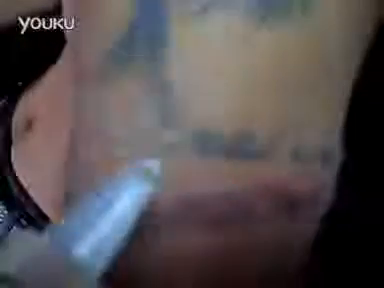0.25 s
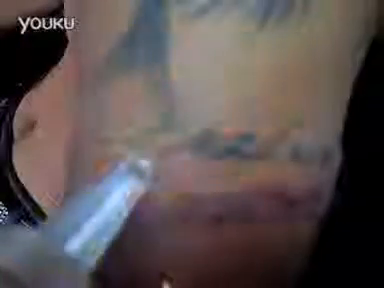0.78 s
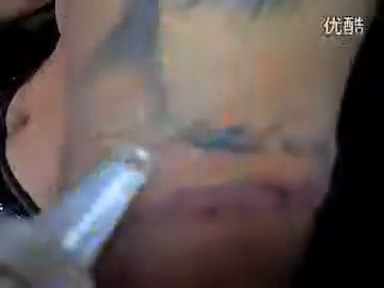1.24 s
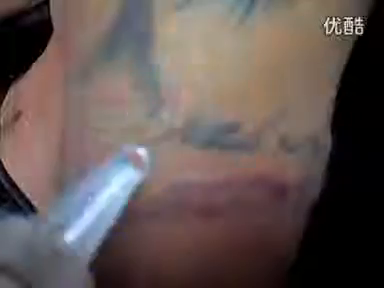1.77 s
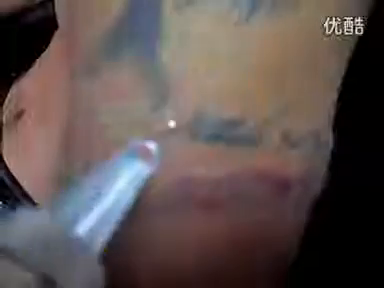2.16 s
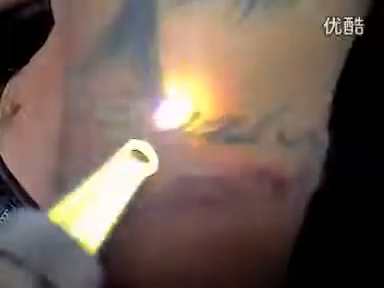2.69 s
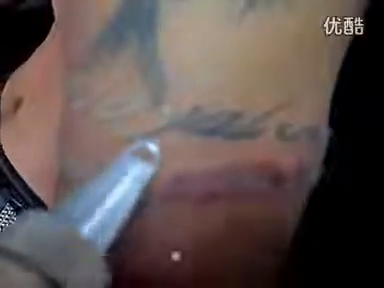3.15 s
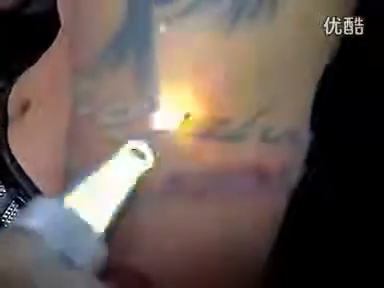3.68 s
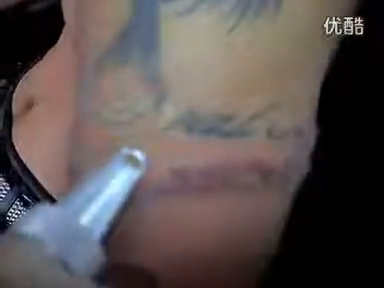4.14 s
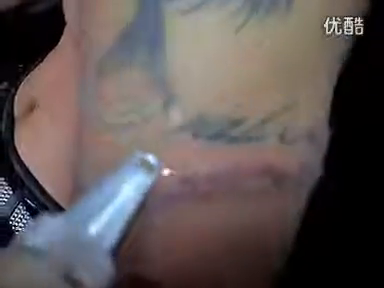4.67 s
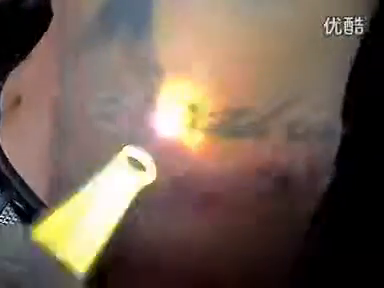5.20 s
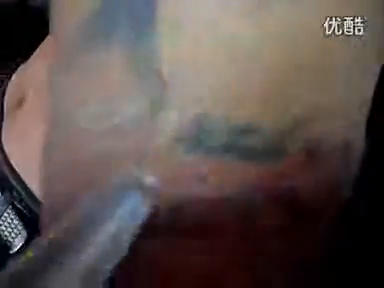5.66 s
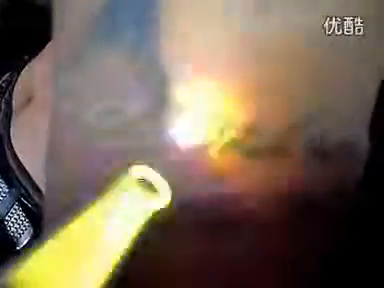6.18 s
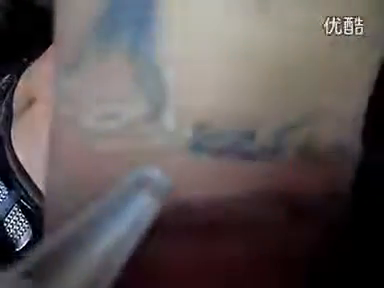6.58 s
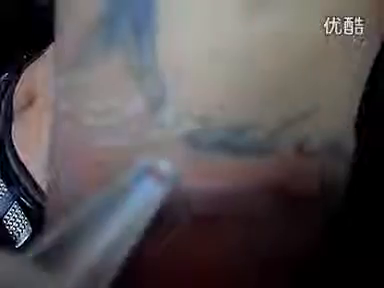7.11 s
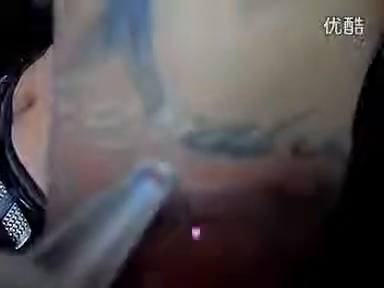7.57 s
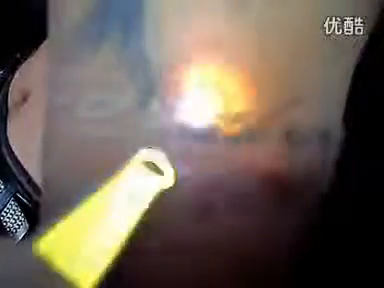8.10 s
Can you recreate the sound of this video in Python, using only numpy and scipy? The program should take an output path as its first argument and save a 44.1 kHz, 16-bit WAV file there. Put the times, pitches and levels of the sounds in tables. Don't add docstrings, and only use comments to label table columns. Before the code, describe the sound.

After just under a second of silence, sound cuts in abruptly: a handheld skin laser snapping very close to a small, overloaded microphone, six even cracks a second. Each is dry, bright and slightly metallic, with quick wall echoes and a short diffuse tail. Beneath run a low electrical hum, soft fan rush and faint rumble. Later shots include a few harder, thumpier ones.

```python
import sys
import numpy as np
from scipy import signal
from scipy.fft import rfft, irfft, next_fast_len
from scipy.io import wavfile
from scipy.ndimage import map_coordinates

SR = 44100
rng = np.random.default_rng(int(sys.argv[2]) if len(sys.argv) > 2 else 0)


def elevation(decibels):
    levels = np.asarray(decibels, float)
    return 10 ** (levels / 20)


def file_out(sig):
    cols = np.atleast_2d(sig).T
    lim = np.clip(cols, -1, 1)
    pcm = np.round(lim * 32767).astype(np.int16)
    wavfile.write(sys.argv[1], SR, pcm)


N = 367353

# time in seconds, level in dB.
HUM = [
    (0.82, -39),
    (0.99, -39),
    (2.26, -40.5),
    (2.6, -38.5),
    (5.67, -36),
    (5.99, -37.5),
    (6.3, -36.5),
    (7.58, -37),
    (8.33, -38),
]
# time in seconds, level in dB.
SHAFT = [(0.82, -40), (0.86, -45), (2.37, -37.5), (2.41, -51), (3.33, -45), (3.41, -64), (3.5, -35.5),
         (5.36, -37.5), (5.42, -39), (6.36, -30.5), (6.93, -32), (7.05, -51), (7.24, -37), (8.33, -34.5)]
# frequency in Hz, level in dB per Hz.
FAN = [(40, 8), (80, -6.5), (200, -2.5), (500, -8), (1000, -13), (2000, -16), (5000, -22), (10000, -59)]
# frequency in Hz, level in dB.
WHINE = [(452.3, -53.5), (338, -63), (483, -57.5)]

# frequency in Hz, time to fall 60 dB in seconds.
ROOM_T60 = [(500, 0.78), (2000, 0.54), (5000, 0.55), (9000, 0.52), (12000, 0.31)]
# frequency in Hz, level in dB.
ROOM_TONE = [(200, -20), (700, -2), (1300, -8), (1900, 2), (2700, -2.5), (3500, 2), (4100, -5), (4700, 0.5),
             (5300, 3), (6000, 0), (7000, -1.5), (9500, 0.5), (11000, -11)]
# frequency in Hz, level in dB.
EARLY = [(500, 13), (3000, 13.5), (4500, 11.5), (10000, 19.5)]
# frequency in Hz, share from 0 to 1.
SAME_PATH = [(500, 0.8), (3500, 0.6), (5000, 0), (10000, 0.37)]
# delay in milliseconds, level in dB.
WALLS = [(6.3, -38), (12.2, -24.5), (14, -12), (18, -36), (21.5, -23), (26.5, -38), (28, -60), (32, -31)]

# frequency in Hz, level in dB, time to fall 60 dB in seconds.
HANDPIECE = [(1837, -2.5, 0.19), (1820, 1.5, 0.053), (1690, 2, 0.07), (1675, -10.5, 0.032), (1947, 5, 0.11),
             (673, -11.5, 1)]
# delay in milliseconds, level in dB.
TICK_PATHS = [(3.5, -7), (8, -6), (14.5, 0), (21, -15), (28, -16)]
TICK_BY_AIM = [-40, -42, -44]

# frequency in Hz, width in Hz, level in dB.
SNAP = [(4270, 570, -22.5), (5100, 370, 9), (7000, 630, 5), (8340, 1500, -2), (9840, 3900, -1.5),
        (3300, 590, 0.5)]
# frequency in Hz, width in Hz, level in dB.
AIM_NEAR = [(930, 334, -8), (2036, 266, -1), (2770, 280, -16.5), (3203, 190, 8), (3780, 215, -3.5),
            (4320, 580, -10.5), (4700, 223, 3.5), (5350, 480, 0.5), (6000, 290, 1), (6470, 480, 6.5),
            (7050, 510, -0.5), (7380, 300, 0.5), (7830, 155, -2), (8200, 170, -5), (8370, 480, 5.5),
            (9250, 160, -1), (9400, 120, -1), (9730, 1330, -1.5), (9580, 290, -1)]
# frequency in Hz, width in Hz, level in dB.
AIM_SIDE = [(1026, 190, -3.5), (1984, 240, -3.5), (2500, 1160, -14.5), (3200, 230, 0), (3730, 320, -6),
            (4370, 240, -1.5), (4840, 270, -1.9), (5190, 330, 0.5), (5860, 270, 0), (6510, 170, 3.5),
            (7045, 175, 3), (7530, 210, 2.5), (7480, 210, -7), (8350, 410, 3.5), (9400, 280, -17),
            (9340, 330, 2), (9700, 180, 0), (9600, 210, -16), (10200, 250, -13), (10900, 250, -31)]
# frequency in Hz, width in Hz, level in dB.
AIM_LOW = [(994, 257, -6.5), (1844, 330, -5.5), (2140, 160, -34), (2540, 158, -4), (3240, 410, -5.5),
           (4110, 330, -2), (4405, 320, 2), (4880, 1400, -7.5), (5320, 320, 7.5), (6270, 340, -2),
           (6380, 350, -12), (6690, 1100, 0.5), (7840, 1450, -1), (9430, 140, -2), (9310, 110, -18),
           (9390, 310, 3), (10190, 500, -2.5), (11240, 140, -33), (11400, 150, -43)]
# delay in milliseconds, directness from 0 to 1.
BOUNCES = [(0.361, 0.53), (0.952, 0.72)]
# strength in dB, burst length in milliseconds, body against snap in dB.
INK_NEAR = [(-31, 1.5, -13), (-34, 1.9, -8.5), (-37, 1.5, -7.5), (-37, 0.95, -7.5), (-37.5, 1.05, -8.5),
            (-34.5, 3.3, -7.5), (-32.5, 2.1, -8), (-38, 1.4, -8), (-34.5, 1.6, -7), (-31, 2.7, -3.5),
            (-33.5, 2.7, -9.5), (-32.5, 2.1, -7), (-45.5, 1.1, -8), (-32, 1.6, -9), (-36, 1.5, -7.5),
            (-34, 1.1, -9.5), (-33.5, 1.1, -8.5), (-37, 1.6, -9)]
# strength in dB, burst length in milliseconds, body against snap in dB.
INK_SIDE = [(-32.5, 1.6, -11.5), (-36.5, 1.15, -11.5), (-36.5, 1.55, -13), (-39.5, 1.8, -11.5),
            (-34, 1.8, -10.5), (-36, 2, -11.5), (-29, 1.2, -8), (-28, 2.6, -5), (-29, 3.9, -6.5),
            (-43, .85, -12), (-34, 1.2, -12)]
# strength in dB, burst length in milliseconds, body against snap in dB.
INK_LOW = [(-35.5, 1.3, -11.5), (-34.5, 2.2, -14.5), (-35, 1.7, -11), (-38.5, 1, -12), (-33.5, 1.9, -10),
           (-34, 1.9, -9.5), (-35.5, 2.3, -11.5), (-33, 1.8, -11.5), (-32.5, 2.6, -9.5), (-33.5, 2, -12.5),
           (-24.5, 3.4, -5.5), (-33, 2.3, -10), (-26.5, 2.4, -6), (-33.5, 2.4, -10), (-30.5, 2.8, -9),
           (-31.5, 1.7, -7.5)]
# time in seconds, level in dB.
BIG_THUMPS = [
    (5.99, -21),
    (7.35, -15),
    (7.69, -12.5),
    (8.02, -21),
]
# frequency in Hz, level in dB.
MICROPHONE = [(20, -0.5), (10250, -0.5), (10500, 0), (11300, -1.5), (12000, -7), (12900, -36), (13300, -80)]

SHOTS = INK_NEAR + INK_SIDE + INK_LOW
STRENGTH_DB, BURST_MS, BODY_DB = np.transpose(SHOTS)
FIRST_S, PERIOD_S = .7458, .169255
START_S = .7932
TAIL = SR * 3 // 5
HUM_HZ = 100.09
FAN_DB, FAN_FOLLOWS = -41.5, 0.65
USUAL_DB = -34
CRACK_DB, CRACK_GROWS = -8.5, 0.43
THUMP_DB = -30
BODY_HZ, BODY_S = 4000, .0021
BLOCK_S, BLOCK_PHASE, GUARD = 1024 / 24000, .4, .6
WIDE_BELOW_DB, EASE_DB_PER_S, WHIM_DB = -35.8, 40, 3.5


def unit(x):
    return x / np.sqrt(np.mean(x ** 2, axis=-1, keepdims=True) + 1e-20)


def along(points, hz):
    f, v = np.transpose(points)
    return np.interp(np.log(hz + 1), np.log(f + 1), v)


def wobble(rate):
    knots = rng.standard_normal(int(N * rate / SR) + 4)
    return map_coordinates(knots, [np.arange(N) * rate / SR])


def filtered(x, response):
    m = next_fast_len(x.shape[-1] + 8192)
    return irfft(rfft(x, m) * response(np.fft.rfftfreq(m, 1 / SR)), m)[..., :x.shape[-1]]


def resonances(modes):
    def response(f):
        total = 0
        for k, (hz, width, db) in enumerate(modes):
            damping = 1j * f * width
            total = total + (-1) ** k * elevation(db) * damping / (hz * hz - f * f + damping)
        return total
    return response


def causal(gain):
    cepstrum = irfft(np.log(gain + 1e-4))
    half = cepstrum.shape[-1] // 2
    fold = np.r_[1, np.full(half - 1, 2), 1, np.zeros(half - 1)]
    return np.exp(rfft(cepstrum * fold))


def echoed(x, paths):
    return filtered(x, lambda f: sum(elevation(db) * np.exp(-2j * np.pi * f * ms / 1000) for ms, db in paths))


def times():
    return FIRST_S + PERIOD_S * np.arange(len(SHOTS))


def aims():
    return np.repeat(np.arange(3), [len(INK_NEAR), len(INK_SIDE), len(INK_LOW)])


def near_db():
    return CRACK_DB + CRACK_GROWS * (STRENGTH_DB - USUAL_DB)


def placed(rows, lead=0):
    out = np.zeros(N + rows.shape[1])
    for s, row in zip(times(), rows):
        out[round(s * SR) - lead:][:len(row)] += row
    return out[:N]


def supply():
    t = np.arange(N) / SR
    rumble_db = np.interp(t, *np.transpose(SHAFT))
    load_db = np.interp(t, *np.transpose(HUM))
    hum = elevation(load_db + 3.5 + 0.76 * wobble(13)) * np.sin(2 * np.pi * HUM_HZ * t + 0.21 * wobble(11))
    drone = np.sin(2 * np.pi * 29 * t + 0.94 * wobble(7.9))
    shake = resonances([(29, 16, 0)])
    rumble = unit(filtered(rng.standard_normal(N), lambda f: shake(f) ** 2))
    fan = unit(filtered(rng.standard_normal(N), lambda f: elevation(along(FAN, f)) * (f > 35)))
    fan_db = FAN_DB + FAN_FOLLOWS * (load_db - load_db.mean()) + 0.96 * wobble(6.3)
    whine = np.zeros(N)
    for hz, db in WHINE:
        whine += elevation(db + 1.2 * wobble(3.87)) * np.sin(2 * np.pi * hz * t + 1.44 * wobble(7))
    return hum + elevation(rumble_db) * (drone + 0.8 * rumble) + elevation(fan_db) * fan + whine


def tails():
    noise = rng.standard_normal((len(SHOTS) + 3, TAIL))
    hz, t, z = signal.stft(noise, SR, nperseg=128)
    same = np.clip(along(SAME_PATH, hz), 0, 1)[:, None]
    z = np.sqrt(same) * z[aims()] + np.sqrt(1 - same) * z[-len(SHOTS):]
    slow = elevation(-60 * t / along(ROOM_T60, hz)[:, None])
    early = elevation(along(EARLY, hz)[:, None] - 60 * t / 0.025)
    tone = elevation(along(ROOM_TONE, hz))[:, None]
    tail = signal.istft(z * (slow + early) * tone, SR, nperseg=128)[1][:, :TAIL]
    build_up = 1 - np.exp(-(np.arange(TAIL) / SR / .003) ** 2)
    return placed(elevation(STRENGTH_DB[:, None] + 6) * tail * build_up)


def patchy(x, depth_db, top_db, holes):
    hz, _, z = signal.stft(x, SR, nperseg=256)
    field = rng.standard_normal((2, 33, z.shape[1] // 16 + 1))
    field = field.repeat(4, 1).repeat(16, 2)[:, :len(hz), :z.shape[1]]
    depth = np.where(hz > 10500, top_db, depth_db)[:, None]
    gain = elevation(depth * np.minimum(field[0], .6)) * (field[1] > holes)
    return signal.istft(z * gain, SR, nperseg=256)[1][:N]


def widening():
    centre = (np.arange(int(N / SR / BLOCK_S) + 1) + BLOCK_PHASE) * BLOCK_S
    last = np.clip((centre - FIRST_S) // PERIOD_S, 0, len(SHOTS) - 1).astype(int)
    age = centre - times()[last]
    tail_db = STRENGTH_DB[last] - EASE_DB_PER_S * age + WHIM_DB * rng.standard_normal(len(age))
    clear = np.minimum(age, PERIOD_S - age) > GUARD * BLOCK_S
    wide = (tail_db < WIDE_BELOW_DB) & clear
    return np.clip(1.9 * np.interp(np.arange(N) / SR, centre, wide) - .1, 0, 1)


def handpiece():
    t = np.arange(TAIL) / SR
    chance = rng.standard_normal((len(SHOTS), len(HANDPIECE)))
    ring = np.zeros((len(SHOTS), TAIL))
    for k, (hz, db, t60) in enumerate(HANDPIECE):
        ring += elevation(db + 0.82 * chance[:, [k]] - 60 * t / t60) * np.sin(2 * np.pi * hz * t)
    shade = elevation(np.take(TICK_BY_AIM, aims()))[:, None]
    return echoed(placed(shade * ring), TICK_PATHS)


def lead_ins():
    ahead = np.arange(512)[::-1] / SR
    shape = elevation(-17 * (ahead > .0029) - 60 * ahead / 0.044)
    hiss = unit(filtered(rng.standard_normal((len(SHOTS), len(ahead))), resonances(SNAP)))
    return placed(elevation(near_db()[:, None] - 10.5) * shape * hiss, lead=len(ahead))


def gap_response(f):
    modes = [np.transpose(a)[:, :, None] for a in (AIM_NEAR, AIM_SIDE, AIM_LOW)]
    chance = rng.standard_normal((len(SHOTS), 2, 24, 1))
    gains = []
    for k, aim in enumerate(aims()):
        hz, width, db = modes[aim]
        scatter_db, drift = chance[k, :, :len(hz)]
        level = elevation(db + scatter_db + (hz < 2500) * (BODY_DB[k] + 13.0))
        detune = (f - hz * (1 + .003 * drift)) / (.9 * width)
        peaks = level / (1 + detune ** 2) ** 1.5
        gains.append(np.sqrt(np.sum(peaks ** 2, axis=0)))
    response = causal(np.array(gains))
    for delay_ms, direct in BOUNCES:
        late = np.exp(-2j * np.pi * f * delay_ms / 1000)
        response = response * (direct - late) / (1 - min(direct, .9) * late)
    return response


def thumps(t):
    thump_db = np.full(len(SHOTS), float(THUMP_DB))
    for s, db in BIG_THUMPS:
        thump_db[round((s - FIRST_S) / PERIOD_S)] = db
    u = t / 0.00035
    return elevation(thump_db[:, None] + 14.5) * (1 - 0.73 * u) * u * np.exp(-u)


def cracks():
    t = np.arange(2048) / SR
    f = np.fft.rfftfreq(len(t), 1 / SR)
    response = gap_response(f)
    fade = np.exp(-(t / (BURST_MS[:, None] * 0.0022)) ** 3)
    spatter = filtered(rng.standard_normal((len(SHOTS), len(t))) * fade ** 2, resonances(SNAP))
    low = 1 / (1 + (f / BODY_HZ) ** 6)
    snap = irfft(response * (1 - low)) * fade
    body = irfft(response * low) * np.exp(-(t / BODY_S) ** 3)
    ring = snap + elevation(2.5) * body
    crack = unit(unit(ring) + elevation(-14) * unit(spatter))
    near = elevation(near_db()[:, None] - 11.5) * crack + thumps(t)
    return near, elevation(STRENGTH_DB[:, None] + 8.5) * crack


def scene():
    near, free = cracks()
    room = patchy(tails(), depth_db=2.0, top_db=10.5, holes=-9)
    mid = placed(near) + lead_ins() + echoed(placed(free), WALLS) + handpiece() + room + supply()
    treble = filtered(tails(), lambda f: (f > 3800) * (f < 12800))
    side = patchy(treble, depth_db=1.5, top_db=10, holes=-1.1)
    return mid + elevation(-2.5) * widening() * np.array([side, -side])


def top_cut(x):
    return signal.sosfilt(signal.butter(12, 13100, fs=SR, output="sos"), x)


def record(dry):
    top = 1.8
    x = dry / (1 + np.abs(dry / top) ** 3) ** (1 / 3)
    x = filtered(x, lambda f: elevation(along(MICROPHONE, f)))
    x = np.clip(x, -1, 1) * (np.arange(N) > START_S * SR)
    return top_cut(x)


dry = scene()
out = record(dry)
file_out(out)
```